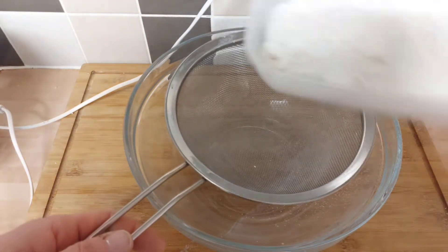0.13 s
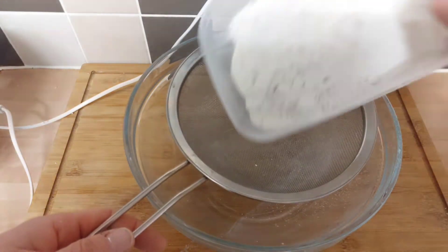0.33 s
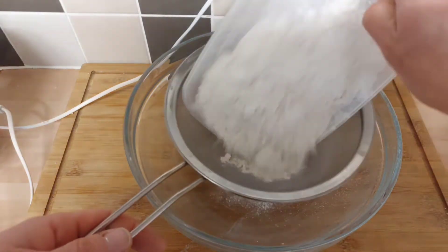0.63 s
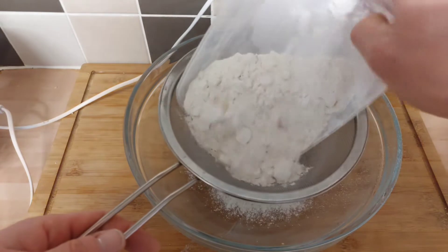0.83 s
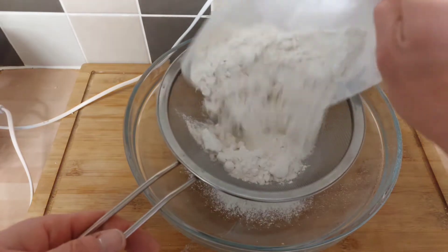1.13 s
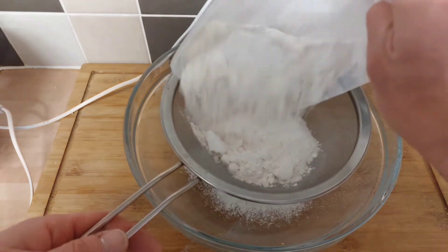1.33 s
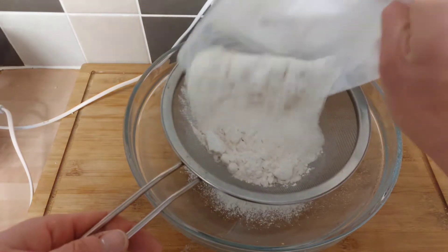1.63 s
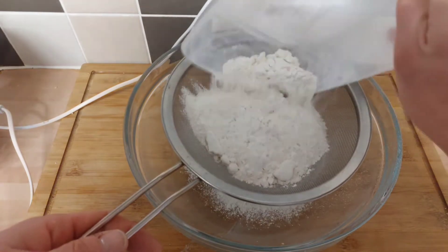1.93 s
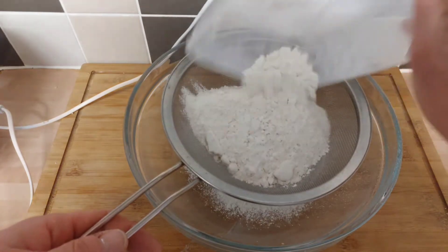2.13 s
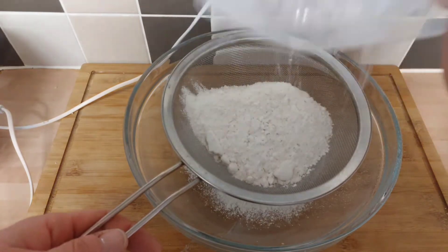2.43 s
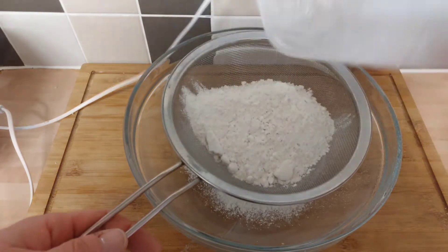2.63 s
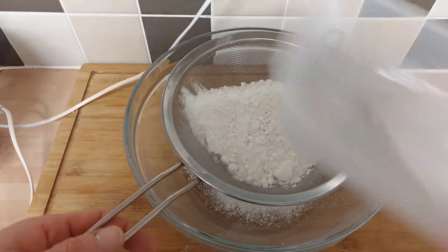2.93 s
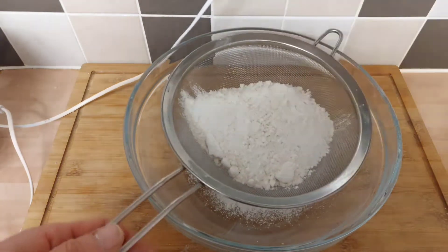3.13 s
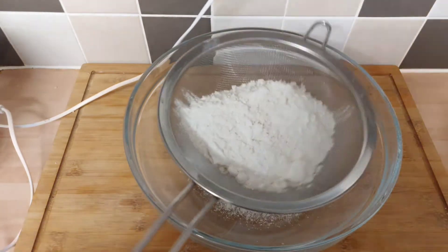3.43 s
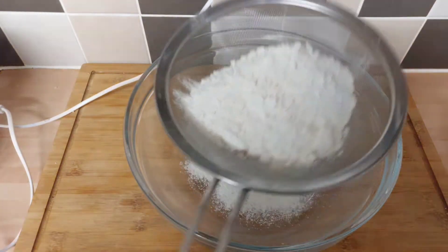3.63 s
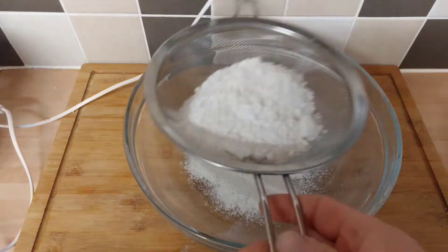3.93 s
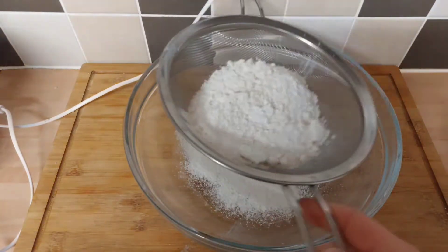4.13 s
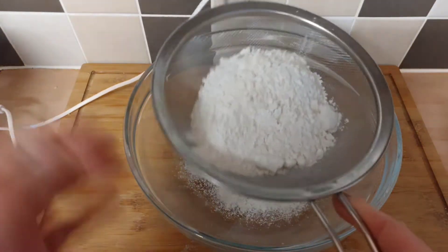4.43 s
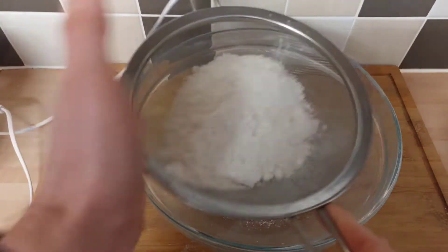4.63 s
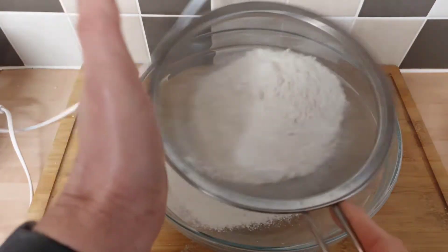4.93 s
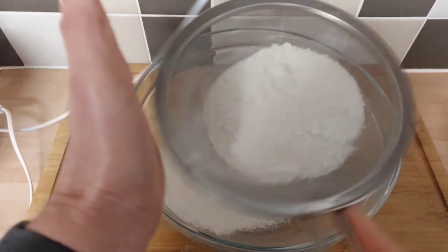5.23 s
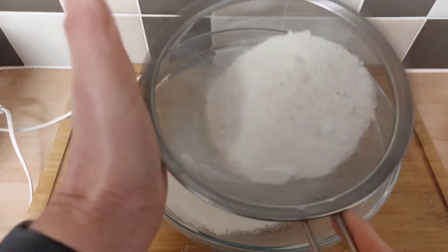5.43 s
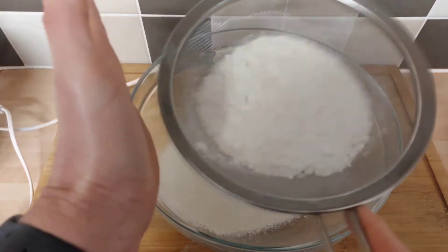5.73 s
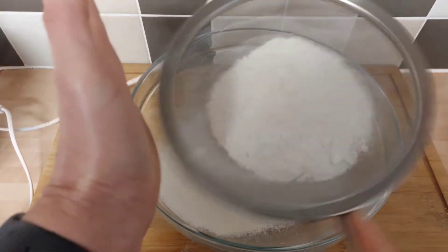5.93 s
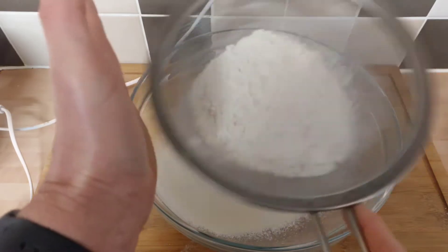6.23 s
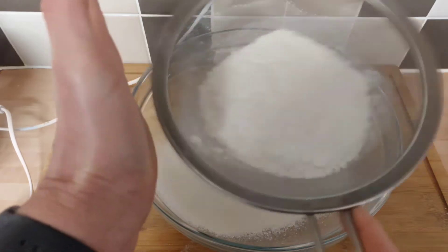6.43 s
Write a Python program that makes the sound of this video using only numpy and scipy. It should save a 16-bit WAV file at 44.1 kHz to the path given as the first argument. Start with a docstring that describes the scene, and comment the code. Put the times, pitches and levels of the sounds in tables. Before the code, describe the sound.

Very quiet room tone and a grainy trickle of flour, with dull bumps and one brief bright clink and scrape at a sieve rim. A crisp double plastic snap follows, then by far the loudest event: a hollow tub clattering and skidding on a hard worktop. Finally, steady hand taps shake the sieve, with light metallic ticks, knocks and powdery puffs. Close stereo microphone, short kitchen echo.

```python
"""In a small hard kitchen, flour is poured from a plastic tub into a mesh sieve over a glass bowl.
The tub clinks on the sieve rim, snaps, is dropped on the worktop and bounces; then the sieve is
shaken against a palm: thump, tick of the loose rim, knock, and a swish of flour through the mesh.
Blows are fading tones plus a noise crack; flour and rubbing are grainy noise that swells and dies;
echoes and a faint room tone surround them."""
import sys
import numpy as np
from scipy import signal
from scipy.fft import rfft, irfft
from scipy.io import wavfile
from scipy.ndimage import uniform_filter1d

SR = 44100
rng = np.random.default_rng(int(sys.argv[2]) if len(sys.argv) > 2 else 0)


def inscribe(sig):
    """Save sig as 16-bit PCM at rate SR to the path in sys.argv[1].

    A 1-D sig is mono; a 2-D sig holds one channel per row.
    Samples are clipped to [-1, 1] before scaling.
    """
    pcm = np.round(np.clip(np.atleast_2d(sig).T, -1, 1) * 32767)
    wavfile.write(sys.argv[1], SR, pcm.astype(np.int16))


N = 290398  # length in samples

# In every table fade_s is the time to die away by 60 dB. In tone and colour tables the levels
# are only relative to each other. density_db is the level per Hz.

# kitchen air and microphone hiss: pitch_hz, density_db
AIR_COLOUR = [(15, -33), (25, 7), (76, -7), (108, -2), (127, -17), (161, -9), (223, -14.5), (301, -13.5),
              (384, -21), (451, -17.5), (887, -31), (1560, -26.5), (1890, -31), (10100, -26.5),
              (16000, -34)]
AIR_DB = -67.5
# steady faint tones: pitch_hz, level_db (average), width_hz
STEADY_TONES = [(108, -77, 10), (294, -85.5, 5.4), (13530, -94, 60)]
# how alike left and right are in the air: pitch_hz, likeness (0 to 1)
AIR_LIKENESS = [(60, 0.98), (180, 0.87), (550, 0.8), (1650, 0.83), (4970, 0.98), (15000, 0.76)]
# how long the kitchen echoes: pitch_hz, fade_s
ECHO_FADE = [(100, 0.53), (500, .45), (1500, 0.36), (4000, 0.33), (10000, 0.16), (16000, 0.14)]
# left-right difference of the sources against their shared sound: pitch_hz, level_db
STEREO_SPREAD = [(60, -21.5), (180, -21), (550, -22), (1650, -25), (4970, -18.5), (15000, -17)]

# fine faint trickle of flour, lasting until the shaking begins:
# peak_s, rise_s, hold_s, fall_s (negative: it cuts the hold short), level_db
TRICKLE = (1, 0.9, 4, -0.2, -88)
# flour slides and sifts, each slide swells and dies: peak_s, rise_s, fall_s, level_db
SIFTS = [(.4, .09, 0.037, -73.5), (.714, .25, .03, -71), (1.46, .1, .06, -74.5), (1.716, 0.029, .14, -74),
         (1.9, 0.048, .1, -78), (2.3, 0.032, .05, -79), (2.52, .18, .09, -70), (2.675, 0.024, .03, -76),
         (4.19, .15, .1, -74), (4.31, .06, 0.19, -75), (4.7, .04, .08, -79), (6.3, .06, .2, -77.5)]
# colour of trickling and sifting flour: pitch_hz, density_db
SIFT_COLOUR = [(1500, -10), (3000, -10), (5000, -6), (9000, -3.5), (12000, -8.5), (14000, -8), (16000, -50)]
# the heap of flour shifts in the shaken sieve: peak_s, rise_s, hold_s, fall_s, level_db
HEAP = (4.85, 0.95, 1, 1.5, -79)
# its dull rustle: pitch_hz, density_db
HEAP_COLOUR = [(200, -17), (500, -17), (1000, 7.5), (2000, -1), (3500, -15), (6000, -29)]
# rubbing squeaks: peak_s, rise_s, fall_s, level_db (lower tone), pitch_hz (lower tone at the peak)
SQUEAKS = [(.622, 0.068, 0.048, -74, 1544), (2.064, 0.022, .06, -84, 1310),
           (4.095, 0.0055, 0.044, -64, 1350), (4.175, .08, .09, -60, 1394), (4.275, .06, .15, -71.5, 1427)]
# palm on the rim or flour landing, and the flour shaken loose:
# middle_s (where the wave crosses zero), level_db, pitch_hz, swish_db
THUMPS = [(0.777, -42, 63.4, -73), (0.872, -51, 129, -76), (0.956, -50.5, 110, -73),
          (1.106, -55, 62.5, -75), (1.525, -48.5, 118, -84), (4.771, -54, 87.4, -78),
          (4.901, -58, 65.8, -76.5), (5.113, -58.5, 104, -78), (5.247, -53, 94, -73),
          (5.428, -51.5, 101, -71), (5.603, -53, 101.2, -69.5), (5.782, -50.5, 97.3, -72.5),
          (5.955, -50.5, 85, -68.5), (6.132, -57.5, 86.4, -69.5), (6.314, -55.5, 123, -68),
          (6.486, -53, 100.8, -69.5)]
# flour through the mesh: pitch_hz, density_db
SWISH_COLOUR = [(3000, -21), (5500, -8), (8000, 1.5), (10500, 1.5), (12500, -6), (16000, -35)]

# tub edge drags on the rim: peak_s, rise_s, hold_s, fall_s, level_db
SCRAPE = (1.128, .016, .03, .014, -56)
# its rough hiss: pitch_hz, density_db
SCRAPE_COLOUR = [(180, -8), (300, -1.5), (685, -4.5), (849, -13), (1120, -6.5), (3690, -14), (4070, -15),
                 (4880, -8.5), (8700, -9), (10100, -7.5), (15500, -28)]
# tub touches the sieve rim: start_s, ring_db, crack_db, low_db, contact_ms, brightness_db_per_octave
CLINKS = [(0.9258, -43.5, -53, -54.5, 2.1, -7.5), (0.9719, -60, -57.5, -57, 1.3, -11)]
# tones of the rim: pitch_hz, level_db, fade_s
RIM_TONES = [(1200, -17, .012), (1850, -11, .03), (2700, -13, .025), (3800, -3, .045), (5100, -2, .045),
             (6500, -4, .04), (7000, -4, .04), (9700, 1, .08), (11000, -2, .07)]
# bowl and board answer low: pitch_hz, level_db, fade_s
BOWL_TONES = [(330, 0, .05), (170, -6, .06)]
# the full tub bumps the sieve, dull:
# start_s, body_db, crack_db, low_db, contact_ms, brightness_db_per_octave
BUMPS = [(0.755, -41, -48.5, -41.5, 4.3, -3), (0.844, -74, -64, -67, 3.3, -2), (0.86, -54, -78, -67, 3, -6),
         (1.072, -58, -64, -72, 2.6, 5.5), (1.514, -47.5, -73, -56, 6.2, -4)]
# tones of the full tub against the sieve: pitch_hz, level_db, fade_s
LOADED_TONES = [(450, 0, .015), (1000, -5, .012), (1600, -4, .012), (2300, -6, .008), (3600, -8, .008)]

# loose rim ticks and flour slaps the mesh: start_s, crack_db, drum_db
TICKS = [(4.4493, -68.5, -75), (4.7634, -69, -84), (4.8, -58, -58.5), (4.8304, -63, -65),
         (4.9836, -70, -65), (5.0642, -56.5, -57), (5.1808, -61, -55.5), (5.3042, -55, -53.5),
         (5.3373, -66, -85), (5.4834, -67, -62), (5.6655, -57, -52), (5.7724, -69, -79),
         (5.872, -52, -53.5), (6.0431, -55, -54), (6.2272, -60, -61), (6.4414, -73, -80.5)]
# tones of the mesh: pitch_hz, level_db, fade_s
MESH_TONES = [(1010, -10, 0.01), (1700, -8, .012), (2334, -18, 0.0097), (3456, -14, 0.0082),
              (5076, 13, 0.0099), (6180, 7, 0.0098), (9290, -1, 0.015), (10400, 6, 0.024)]
# low drum tone of the loaded mesh: pitch_hz, level_db, fade_s
DRUM_TONES = [(543, 0, 0.018)]
# handle knocks and the mesh springing back: start_s, body_db, rebound_db
KNOCKS = [(4.8243, -57.5, -73), (5.0942, -59, -75), (5.2009, -39, -50.5), (5.3663, -37, -50),
          (5.526, -42.5, -55), (5.7066, -42.5, -68), (5.9027, -43, -64), (6.067, -49.5, -68)]
# tones of the handle: pitch_hz, level_db, fade_s
HANDLE_TONES = [(1080, -6, .011), (1600, 0, .0105), (2100, -8, .007), (2550, -8, .007), (3350, -6, .006),
                (4200, -10, .005)]
# crack noise of the sieve and of the snapping tub: pitch_hz, density_db
CRACK_COLOUR = [(1180, -20), (2000, -1), (3310, -3.5), (3680, -8.5), (5680, -0.5), (10800, 4),
                (13000, -13.5), (13700, -20), (16000, -49)]

# the empty tub flexes and snaps in the hand:
# start_s, body_db, crack_db, low_db, contact_ms, brightness_db_per_octave
SNAPS = [(2.7671, -33.5, -44, -45.5, 3.5, 2), (2.7714, -33, -42, -50, 1.4, 2.5),
         (2.8394, -21, -35.5, -50, 2.5, 4.5), (2.8484, -24, -33, -46.5, 1.46, 2)]
# tones of the flexing tub: pitch_hz, level_db, fade_s
SHELL_TONES = [(600, -12, .015), (800, -9, .014), (1230, 0, .02), (1440, 0, .02), (1620, -6, .012),
               (2100, -10, .008), (2700, -12, .008), (3300, -9, .008), (3700, -4, .012), (4230, -5, .01),
               (4900, -10, .005)]
# after hard landings the tub buzzes and skids: peak_s, rise_s, hold_s, fall_s, level_db
RATTLES = [(3.471, .004, .01, .22, -46.5), (3.6, .015, .08, .11, -47.5)]
# tub hits the worktop and bounces: start_s, body_db, crack_db, panel_db
CLATTER = [(3.465, -10.5, -32.5, -23.5), (3.494, -18, -36.5, -33.5), (3.503, -22.5, -47.5, -34.5),
           (3.52, -21, -48, -35.5), (3.558, -23, -42, -34.5), (3.588, -8, -25, -26.5),
           (3.594, -21.5, -26.5, -27), (3.611, -21.5, -46.5, -38), (3.634, -32.5, -41, -27),
           (3.648, -14.5, -33, -31), (3.689, -20.5, -34.5, -33), (3.719, -28, -50, -47)]
# tones of the tub walls: pitch_hz, level_db, fade_s
WALL_TONES = [(765.4, -7, 0.017), (994.3, -5, 0.034), (1087, -15, .15), (1191.6, -4.5, 0.035),
              (1187.4, -18, 0.1998), (1364, -4.5, 0.046), (1566, 3.5, 0.027), (1698, 1, 0.021),
              (1940, -2, 0.022), (2130, -7, .02), (2405, -16.5, 0.015), (2716, -7, .021),
              (3177, -19.5, 0.012)]
# low tones of the tub's bottom panel and the worktop: pitch_hz, level_db, fade_s
PANEL_TONES = [(71.6, -5, 0.09), (119.8, -10, 0.086), (166.6, -8.5, 0.062), (206, -3.5, 0.08),
               (332.8, 5.5, 0.054), (402.3, -3, 0.08), (479, 2, 0.04)]
# crack noise of the dropped tub: pitch_hz, density_db
PLASTIC_COLOUR = [(2000, -25.5), (3400, 3), (3670, -5.5), (4410, -5.5), (4950, -6), (5860, -6), (8150, -6),
                  (9470, -0.5), (11700, -6.5), (16000, -25)]

EDGE_DB = -21  # how far below its peak a swell starts and ends
UPPER_DB, CLIMB_HZ_PER_S = -8.5, 340  # squeak: upper tone against lower; climb of the lower tone
# tick: contact time, ring against its crack, brightness per octave
TICK_MS, TICK_RING_DB, TICK_TILT_DB = 2.9, 0, 5
# knock: contact time, crack and drum against its body, brightness per octave
KNOCK_MS, KNOCK_CRACK_DB, KNOCK_DRUM_DB, KNOCK_TILT_DB = 1.07, -21.5, -23.5, -1
# rebound: delay after the knock, crack and drum against its ring, brightness per octave
REBOUND_S, REBOUND_CRACK_DB, REBOUND_DRUM_DB, REBOUND_TILT_DB = 0.0105, -9.5, -8.5, -10
# a landing at HARD_DB presses for HARD_MS; softer ones press more briefly
HARD_DB, HARD_MS, MS_LOST_PER_DB = -8, 3.16, 0.24
# a crack at SHARP_DB goes with a ring tilted by SHARP_TILT_DB per octave; softer ones are duller
SHARP_DB, SHARP_TILT_DB, TILT_LOST_PER_DB = -24, 4.0, 0.4


def gain_of(db):
    """Turns decibels into a multiplier."""
    return 10 ** (np.asarray(db) / 20)


def evened(x):
    """Scales a sound to an average (rms) level of one."""
    return x / np.sqrt(np.mean(x ** 2) + 1e-20)


def topped(x):
    """Scales a sound to a peak of one."""
    return x / (abs(x).max() + 1e-20)


def read(points, hz):
    """Reads a table between its points, with pitch spaced as the ear hears it (log)."""
    point_hz, value = np.transpose(points)
    return np.interp(np.log(hz + 1), np.log(point_hz + 1), value)


def add(mix, start_s, sound):
    """Mixes a sound in at start_s, cutting off what runs past the end."""
    part = mix[round(start_s * SR):][:len(sound)]
    part += sound[:len(part)]


def coloured(x, points):
    """Weighs each pitch of x by a colour table, then evens the level."""
    gain = gain_of(read(points, np.fft.rfftfreq(len(x), 1 / SR)))
    return evened(irfft(rfft(x) * gain, len(x)))


def swelling(peak_s, rise_s, hold_s, fall_s, db):
    """Corners of a level curve that rises, holds and falls: time and dB."""
    corner_s = peak_s + np.cumsum([-rise_s, rise_s, hold_s, fall_s])
    return np.transpose([corner_s, db + EDGE_DB * np.array([1, 0, 0, 1])])


def follow(corners):
    """Gives the start time of a level curve and its dB at every sample."""
    corner_s, corner_db = np.transpose(corners)
    t = np.arange(corner_s[0], corner_s[-1], 1 / SR)
    return corner_s[0], np.interp(t, corner_s, corner_db)


def whistle(hz, width_hz):
    """Slow noise carried up to the pitch curve hz: a fuzzy tone."""
    r = np.exp(-np.pi * width_hz / SR)
    noise = [1, 1j] @ rng.standard_normal((2, len(hz)))
    slow = signal.lfilter([1], [1, -2 * r, r * r], noise)
    carrier = np.exp(2j * np.pi * np.cumsum(hz) / SR)
    return evened((slow * carrier).real)


def rubbing(corners, colour, grains_per_s, size_db, smooth):
    """Grains of uneven size roughen a finer hiss, which follows the level curve."""
    start_s, db = follow(corners)
    count = len(db)
    hits = rng.random(count) < grains_per_s / SR
    grains = hits * gain_of(size_db * rng.exponential(1, count))
    grain_fade = np.exp(-np.arange(400) / 31.0)
    lumps = smooth + evened(signal.fftconvolve(grains, grain_fade, "same"))
    hiss = coloured(lumps * rng.standard_normal(count), colour)
    return start_s, gain_of(db) * hiss * signal.windows.tukey(count, 0.05)


def ring(tones, rise_ms, tilt_db, spread_db):
    """Fading tones that swell at first; levels and phases vary a little at random from blow to blow."""
    hz, db, fade_s = np.transpose(tones)[:, :, None]
    t = np.arange(SR // 4) / SR
    db = db + tilt_db * np.log2(hz / hz.mean()) + spread_db * rng.standard_normal(hz.shape)
    fading = gain_of(db) * np.exp(-np.log(1000) * t / fade_s)
    waves = fading * np.sin(2 * np.pi * (hz * t + rng.random(hz.shape)))
    rise = 1 - np.exp(-(t * 1000 / rise_ms) ** 2)
    return topped(waves.sum(0) * rise)


def blows(rows, body, low, colour, crack_fade_s, tail_db, low_lag_s, swell):
    """Each blow rings the body and low tones; noise cracks while the contact lasts, then trails off."""
    out, t = np.zeros(N), np.arange(SR // 4) / SR
    for start_s, body_db, crack_db, low_db, contact_ms, tilt_db in rows:
        contact = np.exp(-np.maximum(t * 1000 / contact_ms - 1, 0) ** 2)
        tail = gain_of(tail_db) * np.exp(-np.log(1000) * t / crack_fade_s)
        onset = np.minimum(t / 0.0004, 1)
        crack = coloured(rng.standard_normal(len(t)), colour) * (contact + tail) * onset
        # swell: rise of the ring as a share of the contact time
        body_ring = ring(body, swell * contact_ms, tilt_db, 1.5)
        add(out, start_s, gain_of(body_db) * body_ring + gain_of(crack_db) * crack)
        add(out, start_s + low_lag_s, gain_of(low_db) * ring(low, 2.0, 0, 1.5))
    return out


def air():
    """Steady room tone and microphone hiss with faint drifting patches, plus steady faint tones."""
    frames, hz = N // 256 + 5, np.fft.rfftfreq(1024, 1 / SR)
    a, b, c, d, patches = rng.standard_normal((frames, 513, 5)).T
    patches = uniform_filter1d(patches, 12, 0)  # blur over pitch
    patches = evened(uniform_filter1d(patches, 14, 1))  # blur over time
    same = np.clip(read(AIR_LIKENESS, hz), 0, 1)[:, None]
    mid = a + 1j * b
    side = np.sqrt((1 - same) / (1 + same)) * (c + 1j * d)
    colour = gain_of(read(AIR_COLOUR, hz)[:, None] + 0.43 * patches)
    spectrum = np.array([mid + side, mid - side]) * colour
    hiss = signal.istft(spectrum, nperseg=1024, noverlap=768)[1][:, :N]
    tones = sum(gain_of(db) * whistle(np.full(N, float(f)), width) for f, db, width in STEADY_TONES)
    return gain_of(AIR_DB) * evened(hiss) + tones


def kitchen(x):
    """Sparse echoes, each pitch dying at its own speed, from two echo sets in turn."""
    out = np.zeros(N)
    # a steady swing between two echo sets keeps the tail from sounding alike
    turn = 2 * np.pi * 2.3 * np.arange(N) / SR
    for share in (np.cos(turn), np.sin(turn)):
        taps = np.zeros(SR)
        at = np.arange(160, SR - 20, 20) + rng.integers(0, 20, (SR - 161) // 20)
        taps[at] = rng.choice([-1., 1.], at.shape)
        hz, t, spectrum = signal.stft(taps, SR, nperseg=256)
        fading = np.exp(-np.log(1000) * t / read(ECHO_FADE, hz)[:, None])
        tail = signal.istft(spectrum * fading, SR, nperseg=256)[1]
        out += signal.fftconvolve(x * share, tail / np.linalg.norm(tail))[:N]
    return out


def ports(x, pan_db):
    """Two close microphone ports: the same sound, plus and minus a scattered copy."""
    spread = np.zeros(N)
    turn = 2 * np.pi * 3.1 * np.arange(N) / SR  # steady swing between two scatterings
    for share in (np.cos(turn), np.sin(turn)):
        scatter = rng.standard_normal(1500) * np.exp(-np.arange(1500) / 300)
        spread += signal.oaconvolve(x * share, scatter / np.linalg.norm(scatter))[:N]
    side_gain = gain_of(read(STEREO_SPREAD, np.fft.rfftfreq(N, 1 / SR)))
    side = irfft(rfft(spread) * side_gain, N)
    return np.array([x + side, x - side]) * gain_of([[pan_db / 2], [-pan_db / 2]])


def flour():
    """Many small grains trickle, slide and sift as a bright hiss; the shifting heap rustles dully."""
    out = np.zeros(N)
    slides = [(peak_s, rise_s, 0, fall_s, db) for peak_s, rise_s, fall_s, db in SIFTS]
    for row in [TRICKLE] + slides:
        add(out, *rubbing(swelling(*row), SIFT_COLOUR, grains_per_s=600., size_db=2.0, smooth=3.0))
    add(out, *rubbing(swelling(*HEAP), HEAP_COLOUR, grains_per_s=60., size_db=0.5, smooth=1.4))
    return out


def squeaks():
    """Faint rubbing squeaks: two fuzzy tones that climb slowly together."""
    out = np.zeros(N)
    for peak_s, rise_s, fall_s, peak_db, peak_hz in SQUEAKS:
        start_s, db = follow(swelling(peak_s, rise_s, 0, fall_s, peak_db))
        hz = peak_hz + CLIMB_HZ_PER_S * (np.arange(len(db)) / SR - rise_s)
        tones = whistle(hz, 150) + gain_of(UPPER_DB) * whistle(1.33 * hz, 160)
        add(out, start_s, gain_of(db) * tones * signal.windows.tukey(len(db), 0.1))
    return out


def thumps():
    """Under two soft cycles of low pressure, and a short swish of flour."""
    out, puff = np.zeros(N), np.hanning(round(0.13 * SR))
    for middle_s, db, hz, swish_db in THUMPS:
        t = np.arange(-1.2 / hz, 0.49 / hz, 1 / SR)
        push = np.hanning(len(t)) * np.sin(2 * np.pi * hz * t)
        add(out, middle_s + t[0], gain_of(db) * push)
        swish = puff * coloured(rng.standard_normal(len(puff)), SWISH_COLOUR)
        add(out, middle_s - 0.075, gain_of(swish_db) * swish)
    return out


def scrape():
    """Quick slips of the tub edge: a rough hiss that also rings the rim."""
    corners = swelling(*SCRAPE)
    start_s, hiss = rubbing(corners, SCRAPE_COLOUR, grains_per_s=800., size_db=2.0, smooth=1.2)
    singing = signal.fftconvolve(hiss, ring(RIM_TONES, 0.23, 1.8, 2.0))
    singing *= gain_of(-7.5) * np.linalg.norm(hiss) / np.linalg.norm(singing)
    add(singing, 0, hiss)
    return start_s, singing


def tub_on_sieve():
    """The tub clinks on the ringing rim, bumps it dully and drags along it."""
    out = blows(CLINKS, RIM_TONES, BOWL_TONES, CRACK_COLOUR,
                crack_fade_s=0.1, tail_db=-4.0, low_lag_s=0.00324, swell=0.14)
    out += blows(BUMPS, LOADED_TONES, BOWL_TONES, CRACK_COLOUR,
                 crack_fade_s=0.048, tail_db=-19.0, low_lag_s=0.0034, swell=0.11)
    add(out, *scrape())
    return out


def shaking():
    """Blows ring the mesh (ticks, and a dull rebound after each knock) and the handle (knocks)."""
    mesh = [(s, db + TICK_RING_DB, db, drum_db, TICK_MS, TICK_TILT_DB) for s, db, drum_db in TICKS]
    mesh += [(s + REBOUND_S, db, db + REBOUND_CRACK_DB, db + REBOUND_DRUM_DB, TICK_MS, REBOUND_TILT_DB)
             for s, _, db in KNOCKS]
    handle = [(s, db, db + KNOCK_CRACK_DB, db + KNOCK_DRUM_DB, KNOCK_MS, KNOCK_TILT_DB)
              for s, db, _ in KNOCKS]
    out = blows(mesh, MESH_TONES, DRUM_TONES, CRACK_COLOUR,
                crack_fade_s=0.024, tail_db=-6.5, low_lag_s=0.0045, swell=0.26)
    return out + blows(handle, HANDLE_TONES, DRUM_TONES, CRACK_COLOUR,
                       crack_fade_s=0.068, tail_db=0.5, low_lag_s=0.00394, swell=0.48)


def snaps():
    """The empty tub flexes in the hand: its shell rings briefly with a crack."""
    return blows(SNAPS, SHELL_TONES, PANEL_TONES, CRACK_COLOUR,
                 crack_fade_s=0.11, tail_db=-10.0, low_lag_s=0.002, swell=0.23)


def tub_on_worktop():
    """The dropped tub bounces, buzzes and skids; harder landings press longer, sharper ones ring brighter."""
    rows = []
    for start_s, body_db, crack_db, panel_db in CLATTER:
        contact_ms = max(HARD_MS - MS_LOST_PER_DB * (HARD_DB - body_db), 0.5)
        tilt_db = SHARP_TILT_DB - TILT_LOST_PER_DB * (SHARP_DB - crack_db)
        rows.append((start_s, body_db, crack_db, panel_db, contact_ms, tilt_db))
    out = blows(rows, WALL_TONES, PANEL_TONES, PLASTIC_COLOUR,
                crack_fade_s=0.06, tail_db=-15.0, low_lag_s=0.0022, swell=0.6)
    for row in RATTLES:
        add(out, *rubbing(swelling(*row), PLASTIC_COLOUR, grains_per_s=700., size_db=0.5, smooth=2.1))
    return out


def scene():
    """Near sounds at the sieve, farther ones at the tub, the kitchen's echoes and its air."""
    no_echo = flour() + squeaks() + thumps()  # flour, squeaks and thumps are left without echoes
    near = tub_on_sieve() + shaking()
    snapping, far = snaps(), tub_on_worktop()
    sieve = near + no_echo + gain_of(-9.5) * kitchen(near)
    tub = far + snapping + kitchen(gain_of(-10.0) * far + gain_of(-13.5) * snapping)
    return air() + ports(sieve, pan_db=1.5) + ports(tub, pan_db=-0.2)


def record(dry):
    """The microphone loses the deepest bass; then the highest treble is cut off."""
    thin = signal.sosfilt(signal.butter(8, 36, "high", fs=SR, output="sos"), dry)
    treble_cut = signal.firwin(511, 15780, window=("kaiser", 9), fs=SR)  # cutoff in Hz
    return signal.oaconvolve(thin, treble_cut[None], "same")


dry = scene()
out = record(dry)
inscribe(out)
```